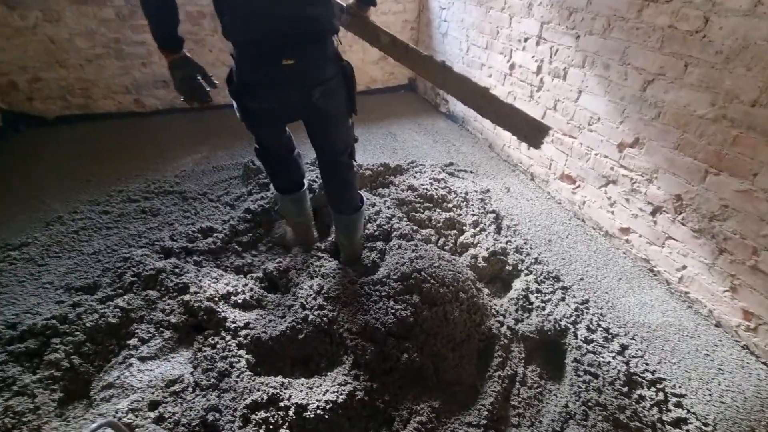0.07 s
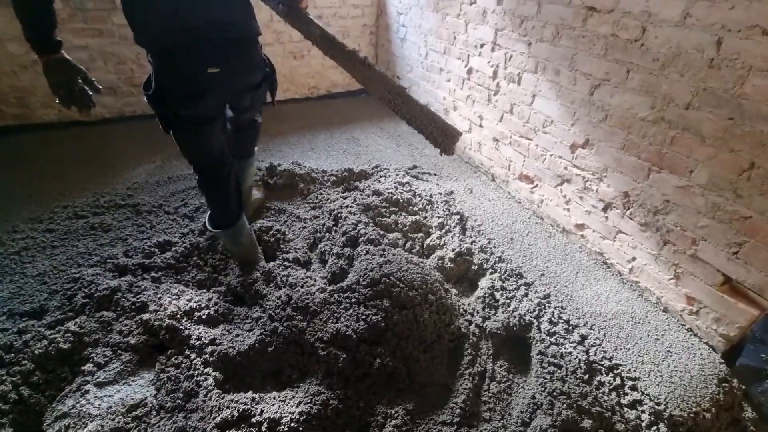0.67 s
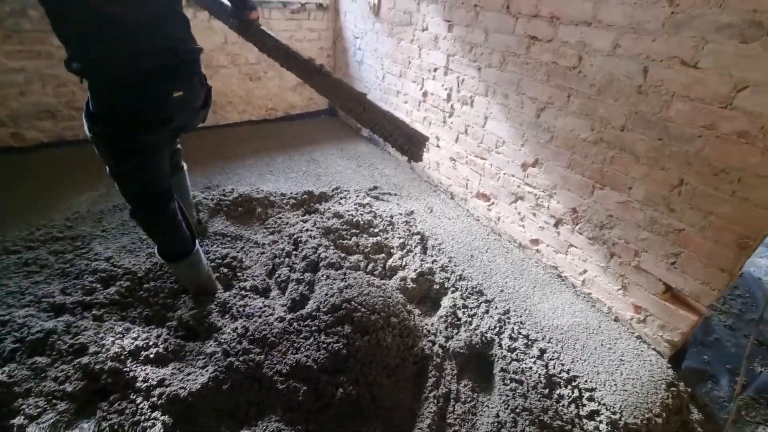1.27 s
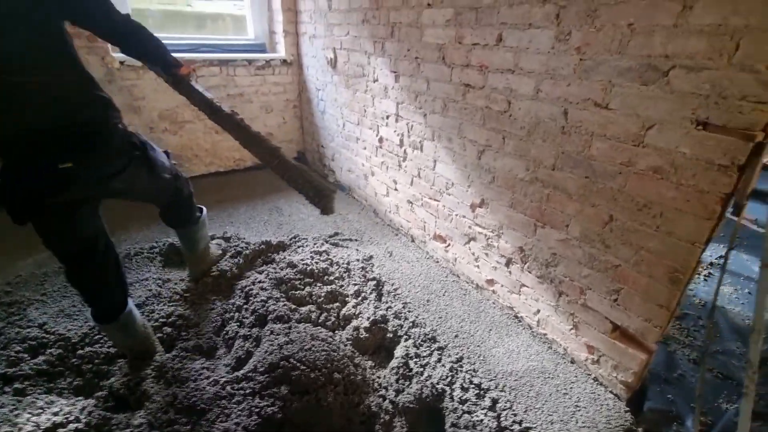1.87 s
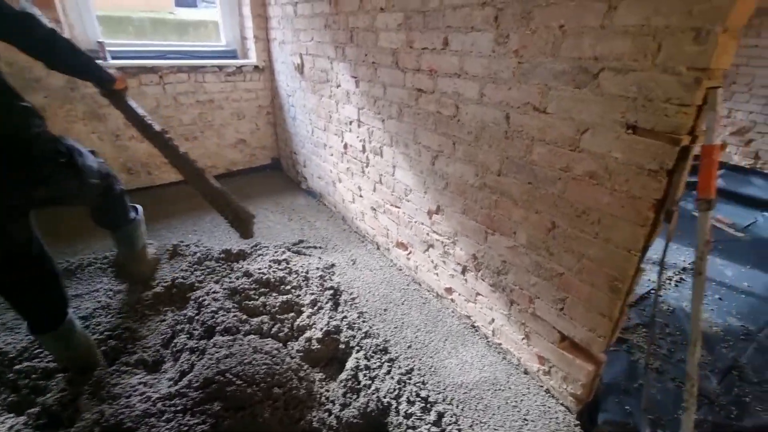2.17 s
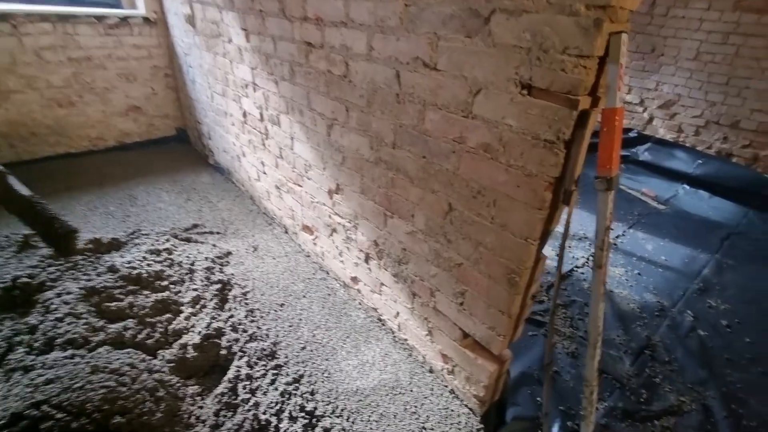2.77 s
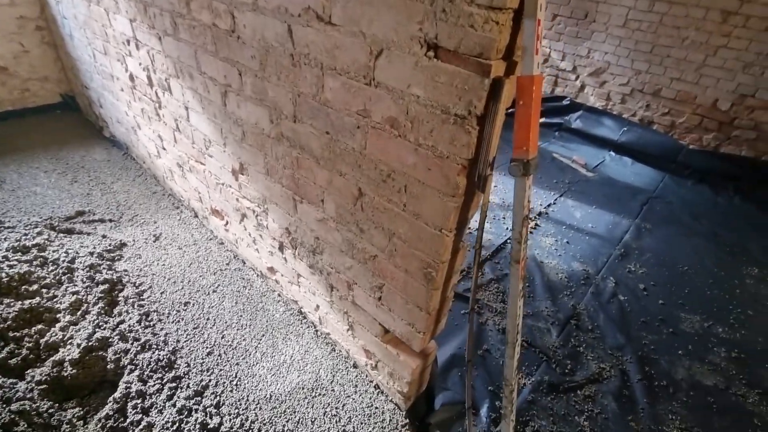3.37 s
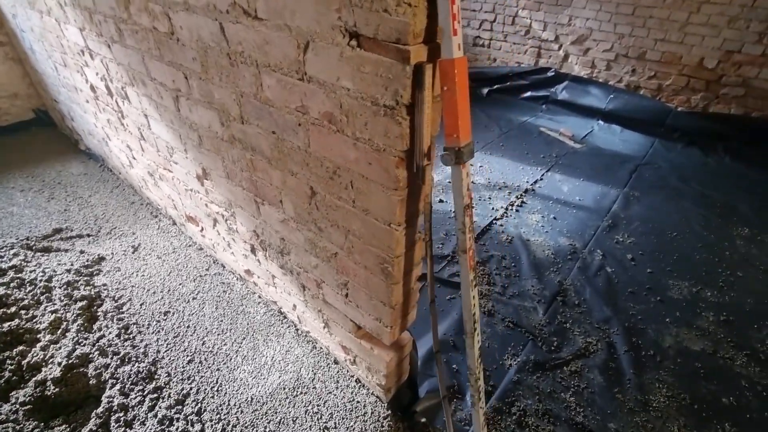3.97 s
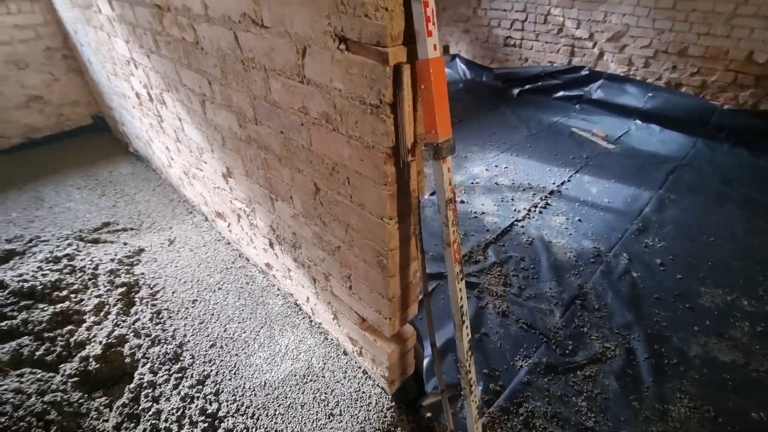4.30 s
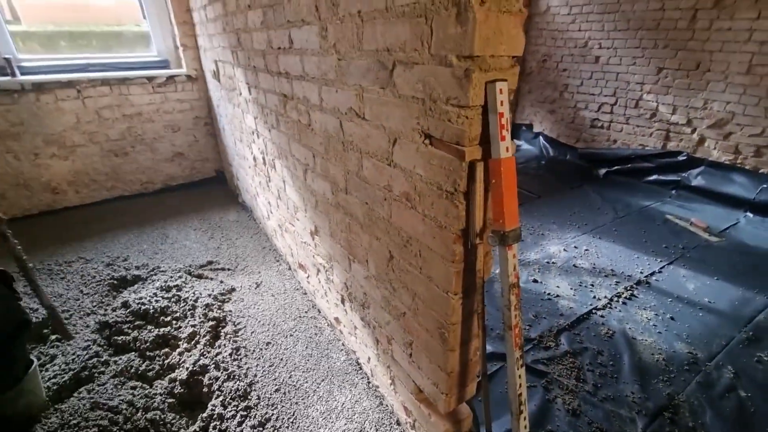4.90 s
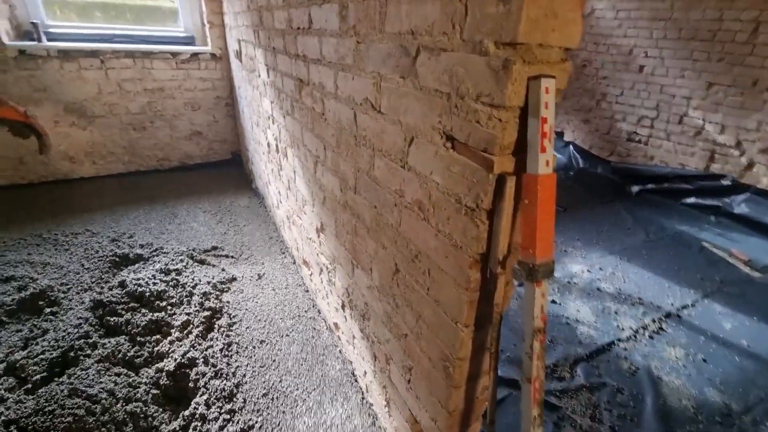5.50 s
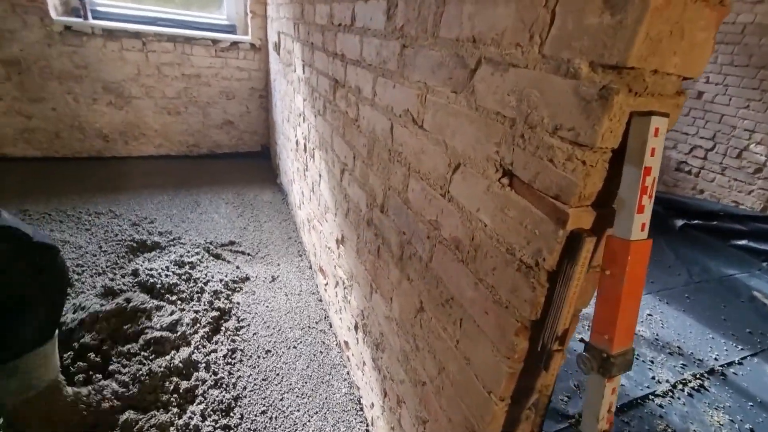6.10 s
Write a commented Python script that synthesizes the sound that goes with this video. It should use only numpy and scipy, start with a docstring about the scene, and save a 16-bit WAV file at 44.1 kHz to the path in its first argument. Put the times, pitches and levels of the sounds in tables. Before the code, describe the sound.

Soft steps in damp sandy screed are barely heard under the constant low throb of a diesel concrete pump running outdoors. The drone changes colour a little as the microphone moves from the room to its doorway. Then come several scraping pushes of a levelling tool, three of them hard, with hissing sand and a few sharp stone clicks that ring off the brick walls.

```python
"""A concrete pump's three-cylinder diesel throbs outside a bare brick room: exhaust lines over a rattling
roar, shifting as the listener moves to a doorway. Inside, a worker treads in damp sandy screed, then
shoves it level in gritty strokes, three of them hard. The shoved mass crunches and sliding sand hisses.
Small stones tick against the tool and echo off the walls."""
import sys
import numpy as np
from scipy import signal
from scipy.fft import rfft, irfft, next_fast_len
from scipy.io import wavfile
from scipy.ndimage import uniform_filter1d, map_coordinates

SR = 44100
rng = np.random.default_rng(int(sys.argv[2]) if len(sys.argv) > 2 else 0)


def transcribe(u):
    """Save the signal u as a 16-bit wav file named by the first command-line argument.

    u: samples, shape (n,) or (channels, n), limited to [-1, 1]; the rate is SR.
    q: integer samples, one column per channel.
    """
    v = np.clip(np.atleast_2d(u).T, -1, 1)
    q = np.round(v * 32767).astype(np.int16)
    wavfile.write(sys.argv[1], SR, q)


N = 275625
TIME_S = np.arange(N) / SR

CYCLE_HZ, FIRST_BEAT_S = 16.47, .019  # four-stroke cycle, its strongest firing
BOOM_HZ, BOOM_WIDTH_HZ = 103, 18  # low boom that rings on after each strongest firing
CRUNCH_LAG_S = 0.019  # the mass gives way after the loose sand
ATTACK_S, HISS_RELEASE_S, CRUNCH_RELEASE_S = 0.019, 0.061, 0.071
TOP_HZ = 15950

# Exhaust lines. Each row: multiple of the cycle rate, level in the room in dB, at the doorway in dB.
EXHAUST_LINES = [(2, -56, -80), (3, -36.5, -43.5), (4, -54, -87), (6, -36, -40), (7, -41, -34.5),
                 (8, -68, -93), (9, -33.5, -32), (11, -62, -39.5), (12, -49.5, -44.5), (13, -52.5, -60),
                 (15, -48, -87), (16, -58, -52.5), (17, -78.5, -47.5), (18, -66, -45.5), (20, -50.5, -53.5),
                 (21, -65, -55.5), (24, -54.5, -50.5), (31, -49, -54.5), (35, -50, -48), (37, -57, -61),
                 (38, -55.5, -51.5), (39, -63, -45.5), (41, -62.5, -50.5), (44, -53, -56.5), (47, -51, -68),
                 (50, -67.5, -52)]
# Path through the standing waves. Each row: time in seconds, place (0 room, 1 doorway),
# gain of line 3 in dB, of line 18 in dB, of the whole engine in dB.
LISTENER_PATH = [(0, 0.46, 2.5, 5.5, -0.5), (1.5, 0, 0, 9, 0.5), (2.0, 0.28, -2, -28, 0),
                 (2.4, 0.28, -8, -24, 0.5), (2.9, 1, 7.5, -3, -2), (3.6, 1, 5.5, -2, -1),
                 (4.4, 0.77, 0, 8, 1), (5.2, 0.8, 2.5, 6.5, 0), (6.25, 0.76, -0.5, 2.5, 1.5)]
# Stone hits. Each row: start in seconds, level in dB, left minus right in dB, treble tilt in dB.
STONE_HITS = [(2.304, -41, -4.5, -11), (2.769, -29.5, -7, -32), (4.547, -11, -8, -5), (5.032, -23, -4, -20),
              (5.416, -30.5, -8, -11), (5.826, -10.5, -6.5, 0)]
# Boots in the screed. Each row: time of full weight in seconds, length in seconds, hiss level in dB,
# crunch over hiss in dB.
BOOT_STEPS = [(.07, .1, -58.5, -14), (0.166, 0.064, -54, 4), (0.43, 0.23, -59.5, 4.5),
              (0.617, 0.12, -60.5, -12), (0.823, 0.27, -61, -4), (.925, 0.11, -62, 6),
              (1.247, 0.15, -61.5, -6), (1.517, .11, -62.5, -2), (1.845, 0.12, -59.5, 3),
              (2.0, 0.091, -63.5, 9.5), (2.1, 0.073, -58.5, 3), (2.36, 0.12, -66.5, 8),
              (2.665, 0.26, -62.5, 10), (2.82, 0.19, -62, 2)]
# Tool pushes. Each row: start in seconds, length in seconds, final hiss level in dB, build-up in dB,
# crunch over hiss in dB, crunch left minus right in dB.
TOOL_STROKES = [(3.096, 0.36, -39, 16, 1, -5), (4.276, .26, -63, -3, 9, -3.5),
                (4.561, 0.14, -37, 2, 0.5, -3.5), (4.813, 0.25, -46.5, 0, 3.5, -5),
                (5.689, .11, -44, 9, 5, -6), (5.822, 0.073, -30, -1, 0.5, -5.5),
                (6.172, 0.11, -61.5, 0, 11, -2)]
# Loose sand trickling. Each row: time in seconds, hiss level in dB.
SAND_TRICKLE = [(0, -65.5), (3.05, -66), (3.3, -57), (4.0, -61), (4.6, -56.5), (5.5, -59), (6.25, -56)]
# Source spectra. Each row: frequency in Hz, relative level in dB.
ROAR_SPECTRUM = [(20, -29), (35, -4), (70, -0.5), (110, 2.5), (190, -1), (260, -6.5), (400, -7), (480, -10),
                 (620, -7.5), (820, -14.5), (1000, -20), (1800, -24), (3000, -56), (8000, -45.5)]
CRACK_SPECTRUM = [(200, 2), (700, 7.5), (1800, 0.5), (3000, -1), (5000, -4), (8000, -4.5), (11000, -13.5),
                  (15000, -13)]
THUD_SPECTRUM = [(200, -10), (800, 11), (1900, 1), (3500, -11.5), (8000, -41)]
CRUNCH_SPECTRUM = [(150, -27), (400, -10), (750, -.5), (950, -.7), (1400, -.3), (1900, 0), (2150, -5.5),
                   (2700, -6), (3500, -10), (6000, -30)]
HISS_SPECTRUM = [(1000, -14), (2200, -3), (3200, -0.5), (4500, 0.5), (6000, -2), (7200, -3.5), (8300, -2),
                 (10500, -8.5), (11700, -8), (13000, -2.5), (15800, -9.5)]
# Brick room decay. Each row: frequency in Hz, T60 in seconds.
BRICK_T60 = [(200, 0.98), (1500, 0.93), (5000, 1), (14000, 0.11)]
# Likeness at the two microphone ports. Each row: frequency in Hz, left-right correlation.
PORT_CORRELATION = [(60, 1), (150, .97), (290, 0.71), (640, -0.36), (1400, -0.49), (3100, -0.16),
                    (6800, -0.014), (15000, -0.0072)]
# Port imbalance. Each row: frequency in Hz, left minus right in dB.
PORT_BALANCE = [(2000, 0.5), (4500, 0.5), (6500, 1), (9000, 4.5), (12500, 0.5), (15500, 3.5)]


def amp(db):
    """Decibels to gain."""
    return 10 ** (np.asarray(db) / 20)


def pan(db):
    """Stereo gains for a left-minus-right level."""
    return amp(np.outer([.5, -.5], db))


def along(points, hz):
    """Interpolate (Hz, value) points on a log axis."""
    knots_hz, values = np.transpose(points)
    return np.interp(np.log(hz + 1), np.log(knots_hz + 1), values)


def curves(rows):
    """One value per sample for each column after the time."""
    times_s, *columns = np.transpose(rows)
    return [np.interp(TIME_S, times_s, column) for column in columns]


def wobble(rate_hz):
    """Smooth random curve, rate_hz knots a second."""
    coarse_s = np.linspace(0, N / SR, num=2000)
    curve = map_coordinates(rng.standard_normal(512), [coarse_s * rate_hz], mode="mirror")
    return np.interp(TIME_S, coarse_s, curve)


def filtered(x, response):
    """Apply a frequency response."""
    size = next_fast_len(N + SR // 2)
    return irfft(rfft(x, size) * response(np.fft.rfftfreq(size, 1 / SR)), size)[..., :N]


def spread_rad(hz):
    """Mid-side angle that gives the ports' correlation."""
    return np.arccos(np.clip(along(PORT_CORRELATION, hz), -1, 1)) / 2


def diffuse(pair, spectrum):
    """Two unrelated signals as a coloured, room-filling sound; mid rms 1."""
    def response(hz):
        return amp(along(spectrum, hz)) * [np.cos(spread_rad(hz)), np.sin(spread_rad(hz))]

    mid, side = filtered(pair, response)
    return np.array([mid + side, mid - side]) / mid.std()


def exhaust(cycle, place, standing_db):
    """A low boom rings on after each cycle's strongest firing; walls scatter the higher lines."""
    out = np.zeros((2, N))
    for order, room_db, door_db in EXHAUST_LINES:
        hz = order * CYCLE_HZ
        # line 3 comes evenly from all cylinders, not from the ringing
        lag_rad = 0 if order == 3 else np.arctan((BOOM_HZ ** 2 - hz ** 2) / (hz * BOOM_WIDTH_HZ))
        scatter = min(1, (hz / 380) ** 3)
        level = amp(room_db) * (1 - place) + amp(door_db) * place
        level *= amp(standing_db.get(order, 0) + 0.13 * scatter + (0.5 + 2.65 * scatter) * wobble(1.82))
        scatter_rad = scatter * (rng.uniform(-np.pi, np.pi) + 0.46 * wobble(1.06))
        phase = 2 * np.pi * order * cycle + lag_rad + scatter_rad
        out -= level * np.cos([phase - spread_rad(hz), phase + spread_rad(hz)])
    return np.sqrt(2) * out


def clatter(cycle, place):
    """Gears and valves repeat one rattle every cycle; each place hears its own version."""
    size = round(SR / CYCLE_HZ)
    index = np.floor(cycle * size).astype(int) % size
    inside, doorway = rng.standard_normal((2, 2, size))[..., index]
    rattle = inside * np.cos(place * np.pi / 2) + doorway * np.sin(place * np.pi / 2)
    return filtered(rattle, lambda hz: hz ** 2 / (hz ** 2 + 420 ** 2))


def engine():
    """Exhaust lines over a mechanical roar that pulses with the firings."""
    place, firing_db, whine_db, engine_db = curves(LISTENER_PATH)
    cycle = CYCLE_HZ * (TIME_S - FIRST_BEAT_S) + .0015 * wobble(7)
    drone = exhaust(cycle, place, standing_db={3: firing_db, 18: whine_db})
    drone *= amp(-2.0 + 0.18 * wobble(22.46)) * pan(-1.9 - 2.54 * place)
    beat_db = 0.23 * np.cos(2 * np.pi * 3 * cycle) + 0.3 * np.cos(2 * np.pi * cycle)
    rattle = clatter(cycle, place)
    roar = diffuse(rng.standard_normal((2, N)) + 1.43 * rattle, ROAR_SPECTRUM)
    roar *= amp(-44.0 + 4.95 * place + beat_db) * pan(-5.5)
    return (drone + roar) * amp(engine_db)


def brick_reverb(x):
    """Reflections off bare brick; the top treble dies first."""
    hz, time_s, bins = signal.stft(rng.standard_normal((2, SR // 2)), SR, nperseg=256)
    decay = amp(-60 * time_s / along(BRICK_T60, hz)[:, None])
    tail = signal.istft(bins * decay, SR, nperseg=256)[1]
    return signal.fftconvolve(x, tail / np.linalg.norm(tail[0]), axes=1)[:, :N]


def impact(colour_db, t60_s):
    """Dying noise through a struck body's minimum-phase response; peak 1."""
    cepstrum = irfft(np.log(amp(colour_db)))
    cepstrum[0] /= 2
    body = irfft(np.exp(2 * rfft(cepstrum[:len(cepstrum) // 2], len(cepstrum))))
    time_s = np.arange(SR // 10) / SR
    noise = rng.standard_normal((2, len(time_s))) * amp(-60 * time_s / t60_s)
    burst = signal.fftconvolve(noise, body[None], axes=1)
    return burst / np.abs(burst).max()


def stone_ticks():
    """Each stone cracks, duller where sand cushions it; the packed sand below thuds."""
    hz = np.fft.rfftfreq(512, 1 / SR)
    tilt = along([(1800, 0.1), (8000, 0.6)], hz)
    out = np.zeros((2, N + SR))
    for start_s, db, side_db, treble_db in STONE_HITS:
        crack = impact(along(CRACK_SPECTRUM, hz) + treble_db * tilt, t60_s=0.0029)
        thud = amp(-13.0) * impact(along(THUD_SPECTRUM, hz), t60_s=0.024)
        start = round(start_s * SR)
        out[:, start:start + crack.shape[1]] += (crack + thud) * amp(db + 4.0) * pan(side_db)
    return out[:, :N]


def grit(size_db, patchy_db):
    """Countless grain contacts of unequal size, in patches of shifting colour."""
    contacts = rng.standard_normal((2, N))
    contacts *= amp(size_db * np.repeat(rng.standard_normal(N), 32)[:N])
    bins = signal.stft(contacts, nperseg=512)[2]
    patches = uniform_filter1d(rng.standard_normal(bins.shape[1:]), size=4, axis=0)
    patches = uniform_filter1d(patches, size=8, axis=1)
    patches /= np.sqrt(np.mean(patches ** 2))
    return signal.istft(bins * amp(patchy_db * patches), nperseg=512)[1][:, :N]


def boot_step(peak_s, length_s):
    """Envelope: weight comes onto a boot and leaves it."""
    return 1 / np.cosh(2 * (TIME_S - peak_s) / length_s)


def tool_stroke(start_s, length_s, build_db, release_s):
    """Envelope: a push gets going, gathers screed ahead of the tool, dies away."""
    early_s = np.maximum(start_s - TIME_S, 0)
    late_s = np.maximum(TIME_S - start_s - length_s, 0)
    travelled = np.clip((TIME_S - start_s) / length_s, 0, 1)
    heap = amp(-build_db * (1 - travelled) ** 1.52)  # changes fastest early on
    return np.exp(-early_s / ATTACK_S - late_s / release_s) * heap


def screed():
    """Shoved screed crunches dully; sand sliding over boots and tool hisses."""
    trickle_db, = curves(SAND_TRICKLE)
    sand = [amp(trickle_db)]
    mass = [amp(trickle_db + 3.5) * pan(-2.5)]  # dull settling
    for peak_s, length_s, db, over_db in BOOT_STEPS:
        sand.append(amp(db) * boot_step(peak_s, length_s))
        mass.append(amp(db + over_db) * boot_step(peak_s + CRUNCH_LAG_S, length_s) * pan(-1.9))
    for start_s, length_s, db, build_db, over_db, side_db in TOOL_STROKES:
        sand.append(amp(db) * tool_stroke(start_s, length_s, build_db, HISS_RELEASE_S))
        shove = tool_stroke(start_s, length_s, build_db, CRUNCH_RELEASE_S)
        mass.append(amp(db + over_db) * shove * pan(side_db))
    sand_level, mass_level = np.linalg.norm(sand, axis=0), np.linalg.norm(mass, axis=0)
    lumps = amp(1.15 * wobble(rate_hz=40))
    crunch = diffuse(grit(size_db=1.0, patchy_db=1.9), CRUNCH_SPECTRUM) * mass_level * lumps
    hiss = diffuse(grit(size_db=1.5, patchy_db=1.8), HISS_SPECTRUM) * sand_level * amp(0.47)
    effort = np.clip((20 * np.log10(sand_level) + 65) / 18, 0, 1)
    return crunch + hiss * pan(-.6 - 3.1 * effort)  # hard strokes come from the right


def scene():
    """Engine outside, work inside."""
    stones = stone_ticks()
    return engine() + screed() + stones + amp(-3.5) * brick_reverb(stones)


def record(dry):
    """The microphone ports colour the treble; the band ends at TOP_HZ."""
    return filtered(dry, lambda hz: pan(along(PORT_BALANCE, hz)) * (hz < TOP_HZ))


dry = scene()
out = record(dry)
transcribe(out)
```